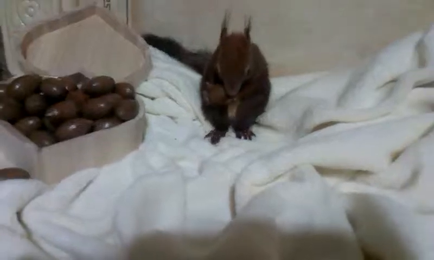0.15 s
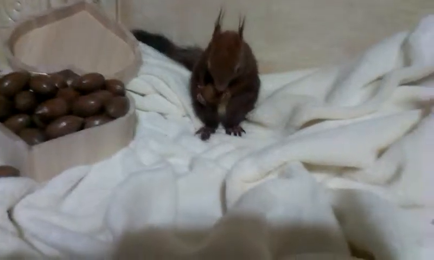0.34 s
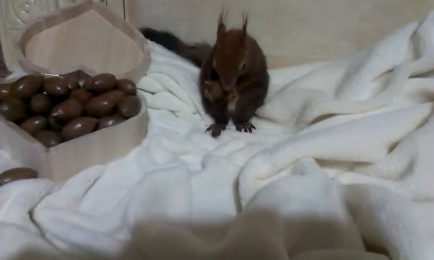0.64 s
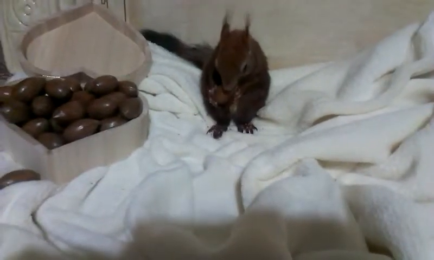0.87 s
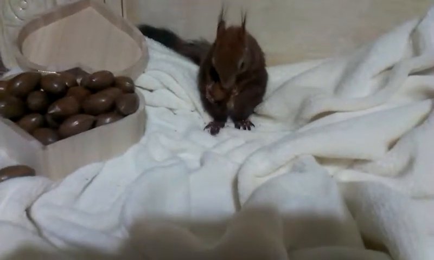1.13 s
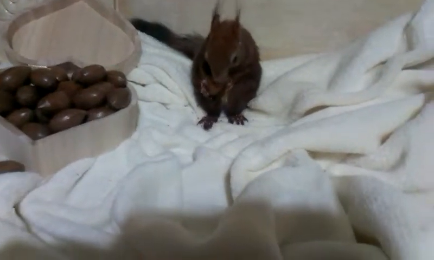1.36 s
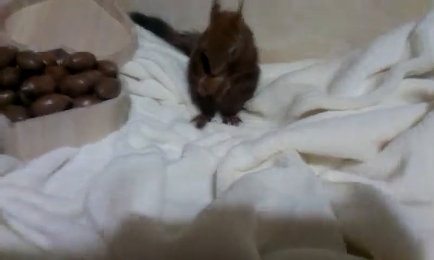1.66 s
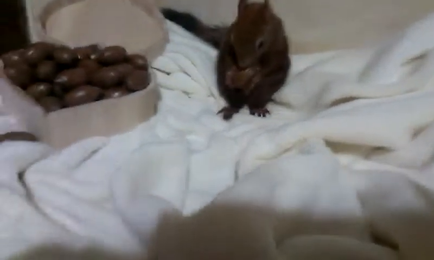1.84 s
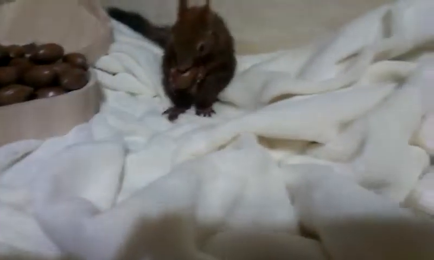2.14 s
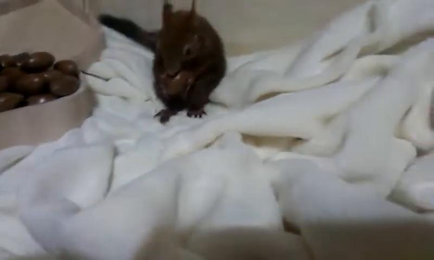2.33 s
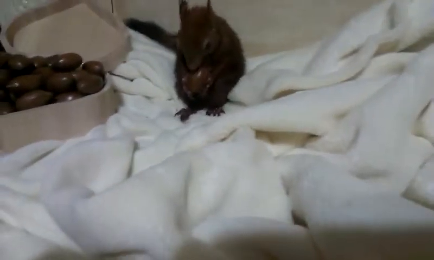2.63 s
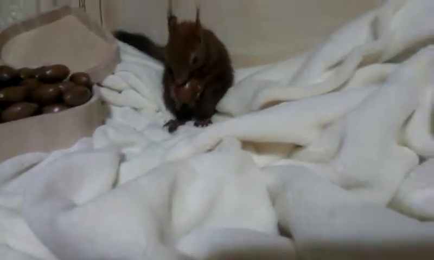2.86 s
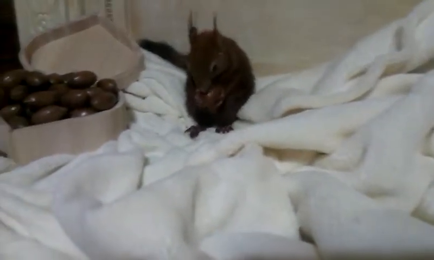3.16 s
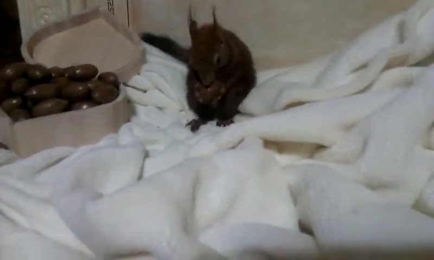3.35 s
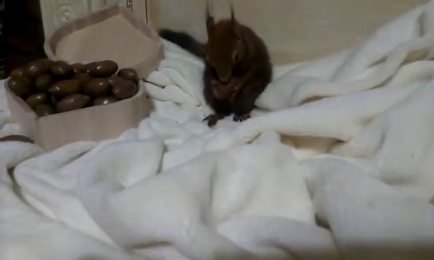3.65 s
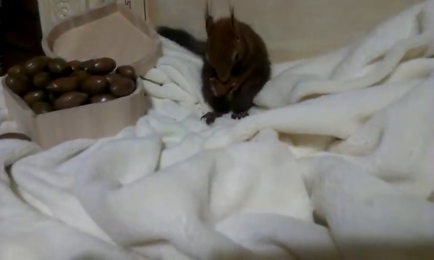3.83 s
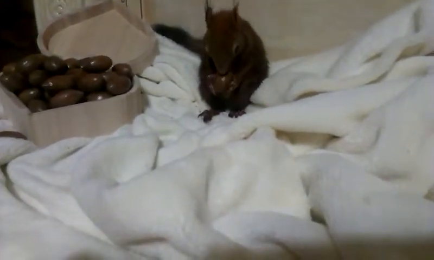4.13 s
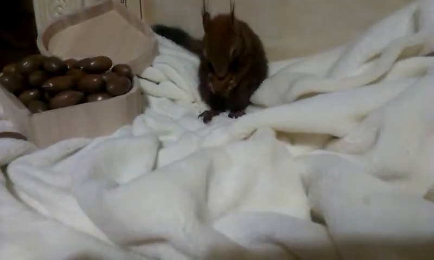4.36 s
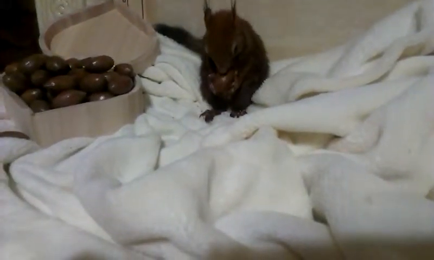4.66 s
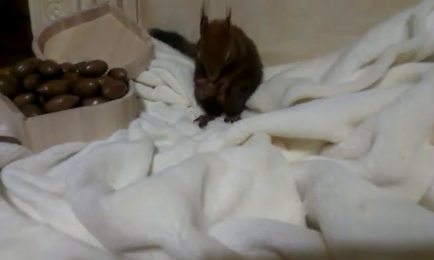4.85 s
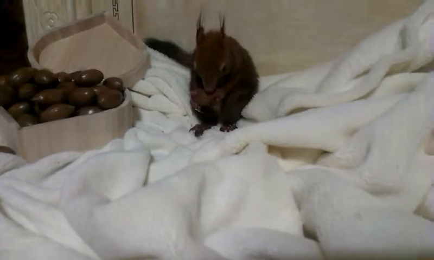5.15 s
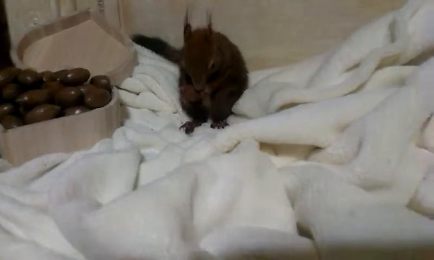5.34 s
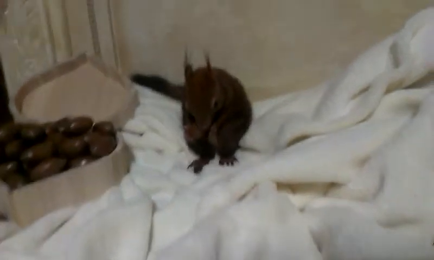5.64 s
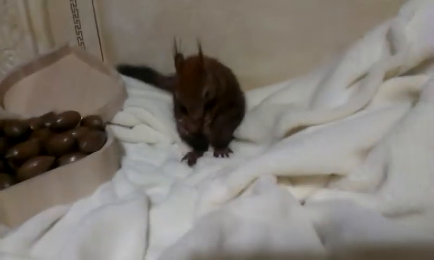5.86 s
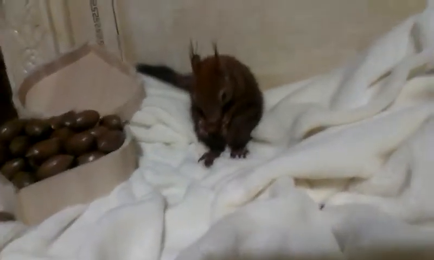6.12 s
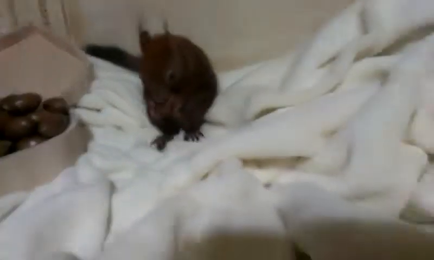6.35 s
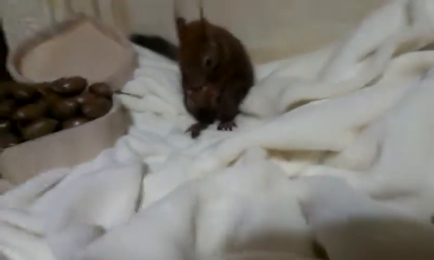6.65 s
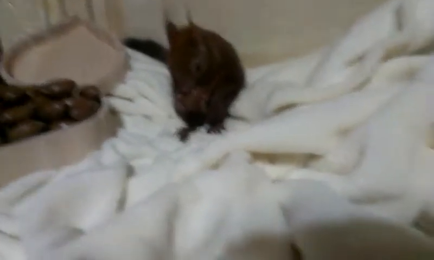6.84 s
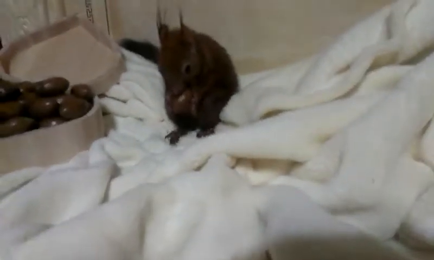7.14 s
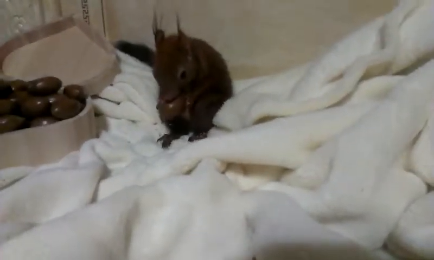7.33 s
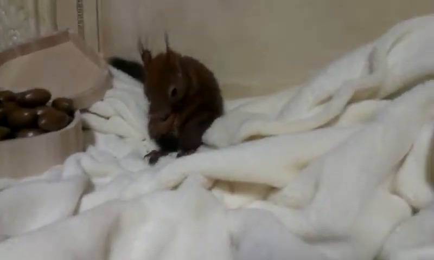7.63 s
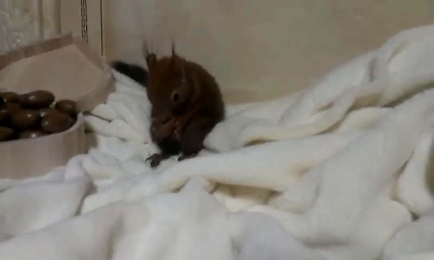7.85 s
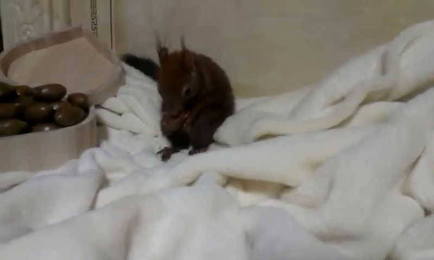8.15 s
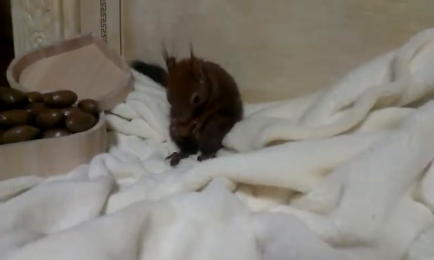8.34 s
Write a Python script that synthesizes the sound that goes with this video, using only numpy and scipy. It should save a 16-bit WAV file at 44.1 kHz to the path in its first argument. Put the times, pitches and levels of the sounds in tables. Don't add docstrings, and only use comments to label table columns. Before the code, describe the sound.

Scattered brittle shell crackles and tiny raspy gnawing strokes, dry and close, softened by blankets with barely any room echo. Bursts are busiest in the first four seconds, then fade to sparse faint nibbles. Sudden handling noise follows: dull knocks, a hard overloaded thump and skin rubbing across the microphone around six seconds. Small cracks and light scraping return near the end. Faint steady hiss lies underneath.

```python
import sys
import numpy as np
from scipy import signal
from scipy.fft import rfft, irfft, next_fast_len
from scipy.io import wavfile
from scipy.ndimage import uniform_filter1d

SR = 44100
rng = np.random.default_rng(int(sys.argv[2]) if len(sys.argv) > 2 else 0)


def int16_out(signal):
    q = np.round(np.clip(np.atleast_2d(signal).T, -1, 1) * 32767)
    wavfile.write(sys.argv[1], SR, q.astype(np.int16))


def makeup_ratio(level_db):
    decades = np.asarray(level_db, float) / 20
    return 10 ** decades


N = 374409


def colour(x, points):
    hz, db = np.transpose(points)
    size = next_fast_len(len(x))
    f_hz = np.maximum(np.arange(size // 2 + 1) * SR / size, 1)
    gain = makeup_ratio(np.interp(np.log(f_hz), np.log(hz), db))
    return irfft(rfft(x, size) * gain, size)[:len(x)]


def unit(x):
    return x / np.sqrt(np.mean(x ** 2))


def band(x, lo_hz, hi_hz):
    return signal.sosfilt(signal.butter(2, [lo_hz, hi_hz], "band", fs=SR, output="sos"), x)


def walk(rate_hz):
    hold = int(SR / rate_hz)
    steps = np.repeat(rng.standard_normal(N // hold + 1), hold)
    return unit(uniform_filter1d(uniform_filter1d(steps, hold), hold)[:N])


def add(out, start_s, x):
    i = max(int(round(start_s * SR)), 0)
    out[i:i + len(x)] += x[:N - i]


def friction(rows, spectrum, split_hz, slips_per_s, scatter_db):
    grains = (rng.random(N) < slips_per_s / SR) * rng.standard_normal(N)
    grains = grains * makeup_ratio(scatter_db * rng.exponential(size=N))
    sound = colour(grains, spectrum)
    low = signal.sosfiltfilt(signal.butter(2, split_hz, fs=SR, output="sos"), sound)
    t = np.arange(N) / SR
    low_gain, high_gain = np.zeros(N), np.zeros(N)
    for s, rise_ms, fall_ms, db, low_db in rows:
        near = slice(int(s * SR), int((s + (rise_ms + 4 * fall_ms) / 1000) * SR))
        ms = (t[near] - s) * 1000
        rise = np.minimum(ms / (.5 * rise_ms), 1)
        fall = np.exp(-(np.maximum(ms - rise_ms, 0) / (1.06 * fall_ms)) ** 2)
        high_gain[near] += makeup_ratio(db) * rise * fall
        low_gain[near] += makeup_ratio(db + low_db) * rise * fall
    return unit(low) * low_gain + unit(sound - low) * high_gain


def breaks():
    # (time [s], peak [dB], brightest [Hz], body re main [dB], thin edge re main [dB])
    snap_rows = [(0.0504, -32.5, 6560, -8.5, -8), (0.0595, -42, 6710, -19, -6),
                 (0.2089, -43, 7140, -21, -12), (0.2634, -38, 6950, -12.5, -20),
                 (0.4488, -47, 5530, -18, -11), (0.4616, -40, 6560, -25, -21),
                 (0.6353, -8, 5400, -19.5, -17.5), (0.6377, -34, 6300, -8, -8),
                 (0.6449, -37, 6150, -19, -16), (0.6501, -39, 5720, -20, -8.5),
                 (0.9425, -40, 5180, -13, -11), (1.1024, -39, 6930, 1.5, -15),
                 (1.1161, -27, 7120, -21, -5.5), (1.2652, -43, 5310, -8, -15),
                 (1.2737, -26.5, 6560, -16, -5), (1.2926, -36, 5940, -3.5, -14),
                 (1.2973, -40, 4240, -3, -15), (1.4533, -42.5, 5120, -13, -17),
                 (1.4622, -27, 5490, -17, -8), (1.4881, -39, 6150, -5, -20),
                 (1.5069, -19, 6300, -17.5, -18), (1.5699, -42.5, 6350, -17, -19),
                 (2.556, -32, 6330, -23, -19), (2.568, -32.5, 7080, -13.5, -17),
                 (3.0783, -29, 5770, -11, -15), (3.2668, -46, 6630, -8, -16.5),
                 (3.5435, -36.5, 5870, -9.5, -24), (3.6344, -40, 5720, -18.5, -19),
                 (3.7938, -30, 6480, -6.5, -21), (3.7967, -37, 6410, -8, -12),
                 (3.8217, -31, 6220, -10.5, -16), (3.8239, -26, 5870, -14, -23),
                 (5.6199, -49.5, 4300, -2.5, -28), (5.7461, -39, 4280, -5.5, -13),
                 (6.3361, -45, 7010, -7, -15), (6.5218, -33, 6180, -10.5, -14),
                 (6.5328, -28, 6150, -10, -15), (6.5389, -35, 6220, -9, -5),
                 (7.8207, -37.5, 6450, -17, -22), (7.8419, -42, 5030, -11, -12)]
    # (time [s], peak [dB], brightest [Hz])
    chip_rows = [(0.2256, -41, 7100), (0.231, -43, 6930), (0.2612, -42, 7080), (0.4356, -52, 6350),
                 (0.6155, -51, 6130), (0.7139, -46, 7270), (1.0754, -54, 5420), (1.0772, -49, 4220),
                 (1.089, -53, 4220), (1.2537, -47, 5140), (1.2578, -44, 5140), (1.3065, -46, 4320),
                 (1.3472, -48, 6350), (1.3585, -50, 6930), (1.4181, -52, 6710), (1.4683, -41.5, 5980),
                 (1.4781, -40, 5980), (1.4899, -54, 5980), (1.5168, -46, 6350), (1.5201, -49, 6390),
                 (1.594, -53, 6240), (1.5955, -46.5, 6820), (1.5973, -49, 6200), (1.6062, -50, 6000),
                 (1.7385, -47.5, 5230), (2.5212, -48, 6540), (2.5453, -49.5, 5530), (2.5505, -44, 6350),
                 (2.9643, -49.5, 6580), (3.4018, -46, 7060), (3.4044, -51.5, 5790), (3.406, -45, 6610),
                 (3.4179, -49, 6990), (3.5353, -43.5, 7100), (3.5458, -39, 6050), (3.5498, -44, 6480),
                 (3.557, -47, 6430), (3.5641, -46, 5850), (3.5712, -50, 5920), (3.5819, -43, 5850),
                 (3.5948, -43, 5570), (3.5986, -46, 5740), (3.7804, -43, 5660), (3.8085, -46.5, 6580),
                 (3.9692, -53, 6730), (3.9715, -45, 6520), (3.9782, -45, 6430), (4.1148, -56, 6240),
                 (4.4772, -48.5, 5870), (4.8073, -49.5, 6840), (5.7382, -51.5, 4240), (5.7487, -49.5, 4320),
                 (5.8274, -49.5, 5770), (6.4982, -51, 6610), (6.5403, -37, 6240), (6.5473, -44, 6430),
                 (6.5566, -50, 5850), (7.608, -47, 6330), (7.7758, -50, 6710), (7.8221, -48, 6820)]
    # (time [s], peak [dB])
    crumb_rows = [(0.046, -53), (0.1173, -50), (0.2373, -58), (0.2462, -51), (0.2666, -55), (0.6212, -49),
                  (0.7173, -54), (0.7504, -55), (1.0729, -53), (1.128, -52), (1.186, -56), (1.187, -55),
                  (1.2466, -48), (1.5311, -43), (1.7899, -54), (1.922, -53), (1.9986, -55.5), (2.182, -52),
                  (2.1897, -51), (2.3155, -56.5), (2.3496, -52), (2.5232, -49), (2.538, -55.5),
                  (2.5773, -52.5), (3.0664, -63), (3.0929, -52), (3.1022, -53), (3.2347, -51),
                  (3.4485, -50), (3.6378, -51), (3.643, -50), (3.7752, -53), (3.7782, -50), (3.96, -53),
                  (4.0439, -52.5), (4.9323, -53), (4.9347, -61), (5.417, -53.5), (5.593, -54),
                  (6.3238, -54.5), (6.351, -58), (6.4444, -58), (6.5534, -52), (7.5723, -54),
                  (7.6184, -53.5), (7.761, -54.5), (7.808, -53), (7.8126, -55), (7.8435, -49),
                  (7.8451, -51)]
    chip_hz, chip_spread_hz = 6100, 300
    body_mean_db, body_spread_db = -10, 2
    edge_mean_db, edge_spread_db = -16, 3
    chance = rng.standard_normal((200, 3))
    small = list(chip_rows)
    for (s, db), c in zip(crumb_rows, chance[:, 2]):
        small.append((s, db, chip_hz + chip_spread_hz * c))
    rows = list(snap_rows)
    for (s, db, hz), (a, b, _) in zip(small, chance):
        rows.append((s, db, hz, body_mean_db + body_spread_db * a, edge_mean_db + edge_spread_db * b))
    return rows


def cracks():
    # (frequency [Hz], width [Hz], level [dB])
    shell_modes = [(1430, 300, -18), (2440, 330, -14), (3450, 330, -18), (4350, 700, -10), (5400, 650, 0),
                   (6300, 600, -2), (7000, 500, -5), (8300, 500, -14), (9300, 900, -13), (10100, 700, -15)]
    ring_damping, ring_attack_s = 1.35, .0002
    crumble_db, crumble_s = -26, .0015
    echo_s, echo_db = .00103, -8
    out, t = np.zeros(N), np.arange(300) / SR
    hz, width_hz, mode_db = np.transpose(shell_modes)[:, :, None]
    modes = len(hz)
    body, edge = hz[:, 0] < 3800, hz[:, 0] > 7600
    since = t[:130]
    crumble = makeup_ratio(crumble_db) * np.exp(-since / crumble_s)
    decay = np.exp(-np.pi * ring_damping * width_hz * t)
    attack = 1 - np.exp(-t / ring_attack_s)
    alternate = (-1) ** np.arange(modes)[:, None]
    chance = rng.standard_normal((200, 2 * modes + 131))
    for (s, peak_db, bright_hz, body_db, edge_db), row in zip(breaks(), chance):
        detune, scatter = row[:2 * modes].reshape(2, -1, 1)
        off_hz = hz - bright_hz
        favour_db = -6 * (off_hz / 900) ** 2 / (1 + (off_hz / 1200) ** 2) * ~body[:, None]
        level = alternate * makeup_ratio(mode_db + favour_db + 1.4 * scatter)
        rings = level * np.sin(2 * np.pi * hz * (1 + 0.01505 * detune) * t) * decay * attack
        force = row[-len(since):] * crumble + (since == 0)
        echo_at = echo_s * (1 + .02 * row[-len(since) - 1]) * SR
        force[int(np.clip(echo_at, 20, 100))] -= makeup_ratio(echo_db)
        parts = (~body & ~edge, body, edge)
        main, low, top = (unit(np.convolve(rings[part].sum(axis=0), force)) for part in parts)
        piece = main + makeup_ratio(body_db) * low + makeup_ratio(edge_db) * top
        add(out, s - .0001, makeup_ratio(peak_db) * piece / np.abs(main).max())
    return out


def scraping():
    # (start [s], length [ms], level [dB], hollow body re level [dB])
    stroke_rows = [(.044, 27, -56.5, -12), (.207, 32, -59, -8), (0.257, 28, -64.5, -9),
                   (0.633, 39, -55.5, -4), (.705, 56, -68, -23), (.918, 39, -63.5, -6),
                   (1.068, 33, -62, -1), (1.11, 29, -56, -5.5), (1.243, 70, -58.5, -3),
                   (1.455, 28, -55, -2.5), (1.48, 59, -73, 9), (2.171, 41, -63, -7), (2.32, 52, -63, -6.5),
                   (2.513, 20, -61, -14), (2.541, 46, -58, -10), (2.865, 50, -68.5, -5),
                   (3.037, 57, -63.5, -5.5), (3.233, 42, -60, -6.5), (3.398, 32, -56, -6.5),
                   (3.529, 46, -53.5, -7.5), (3.77, 48, -57, -9), (3.815, 25, -49.5, -7),
                   (3.958, 39, -58.5, -6), (5.559, 70, -77, 4), (5.731, 41, -68.5, 4), (6.319, 51, -68, -1),
                   (6.524, 40, -61, 0), (6.573, 150, -74.5, 7), (7.535, 115, -69.5, -6),
                   (7.804, 63, -65, -12)]
    # (start [s], length [ms], level [dB])
    nibble_rows = [(0.311, 6.3, -66), (.741, 12, -67), (1.085, 10, -65), (5.445, 12, -68), (5.587, 16, -73),
                   (5.67, 15, -72), (1.343, 42, -69), (1.588, 18, -61.5), (3.59, 18, -67.5),
                   (3.631, 20, -65), (4.04, 9.3, -61), (4.448, 40, -67.5), (4.538, 12, -70),
                   (4.927, 39, -65.5), (5.267, 39, -69), (5.415, 23, -68.5), (5.499, 20, -69),
                   (5.821, 17, -65.5), (7.744, 44, -68.5), (8.1, 26, -71), (8.26, 30, -73)]
    # (frequency [Hz], density [dB per Hz])
    scrape_spectrum = [(500, -35), (900, -17), (1900, -13), (2350, -3), (3000, -11), (4900, -13), (5600, 0),
                       (6600, -1), (7300, -5), (8000, -17), (10300, -18)]
    nibble_body_db, bite_in_share = -6.5, .33
    strokes = list(stroke_rows) + [(s, ms, db, nibble_body_db) for s, ms, db in nibble_rows]
    rows = [(s, bite_in_share * ms, (1 - bite_in_share) * ms, db, body_db)
            for s, ms, db, body_db in strokes]
    return friction(rows, scrape_spectrum, split_hz=4200, slips_per_s=6000, scatter_db=1.6)


def turned(nut):
    # (time [s], opening gain [dB], rim gain [dB])
    facing_rows = [(0, -1, -2), (.5, -1, 3), (1.1, 8, 0), (1.35, 2, 0), (1.6, 2, -2), (2.1, -2, -0.5),
                   (2.6, -4, -2), (3.1, -5, -5), (3.5, -1, -3), (3.85, 1, -2), (5.2, 0, 0), (5.55, 11, -3),
                   (5.79, 7, -3), (5.82, 5, 0), (6.45, 3, -8), (6.56, 7, -12), (7.7, -2, -3), (7.84, 5, 2)]
    opening_hz, rim_hz = (3300, 4700), (4700, 5600)
    s, *gains_db = np.transpose(facing_rows)
    t = np.arange(N) / SR
    out = nut
    for db, hz in zip(gains_db, (opening_hz, rim_hz)):
        part = signal.sosfiltfilt(signal.butter(2, hz, "band", fs=SR, output="sos"), nut)
        out = out + (makeup_ratio(np.interp(t, s, db)) - 1) * part
    return out


def thuds(rows, ring_cycles):
    out = np.zeros(N)
    for s, db, hz, direction, load_cycles in rows:
        cycles = np.arange(-int(3 * SR / hz), int(4 * SR / hz)) * hz / SR
        envelope = np.exp(np.where(cycles < 0, cycles / max(load_cycles, .02), -cycles / ring_cycles))
        swing = envelope * np.cos(2 * np.pi * cycles)
        leak = np.exp(-((cycles - .3) / 0.66) ** 2)
        balanced = swing - leak * swing.sum() / leak.sum()
        add(out, s + cycles[0] / hz, direction * makeup_ratio(db) * balanced)
    return out


def knocks():
    # (peak time [s], peak [dB], frequency [Hz], direction [signed gain], load-up [cycles])
    knock_rows = [(0.2198, -25.5, 197, 0.51, 0.23), (1.0296, -59, 200, -0.91, 0.49),
                  (1.5702, -46.5, 750, -0.82, 0.2), (1.5959, -48.5, 279, 0.57, 0.24),
                  (1.8234, -53.5, 267, 0.94, 0.53), (2.0885, -19, 342, 0.83, 0.1),
                  (2.628, -55.5, 352.6, 1, 0.3), (3.9225, -44, 742, -0.61, 0.28),
                  (5.5036, -38.5, 249.1, 0.84, 0.086), (5.7119, -48, 423, 0.92, 0.15),
                  (5.7637, -36, 184.4, 0.21, 0.12), (5.8544, -48, 818, 0.64, 0.24),
                  (5.929, -33.5, 227, -0.62, 0.096), (5.9414, -38.5, 343, -0.99, 0.11),
                  (5.9529, -41, 397, -0.84, .15), (5.9806, -45, 300, -1, .2), (5.9952, -48, 353, -1, .15),
                  (6.0031, -47, 300, -0.69, .15), (6.0234, -48, 495, 0.58, .15),
                  (6.052, -48.5, 400, 1, .15), (5.417, -54, 700, 1, .2), (5.6028, -56, 796, 0.88, .2),
                  (5.8778, -52, 800, 1, .1), (5.8881, -52, 800, 0.9, .15), (6.1851, -37, 690, 0.83, .15),
                  (6.2228, -49, 600, 1, .15), (6.4458, -55, 596, 0.85, .2), (7.0331, -54, 332, 1, .25),
                  (5.9495, -22, 247, 0.14, 0.055), (6.1607, -25.5, 650, -0.86, 0.22),
                  (6.2305, -31.5, 376, -0.61, 0.063), (6.268, -38, 228, 0.86, 0.04),
                  (6.4944, -43, 620, 1, 0.33), (6.5686, -23, 620, 0.82, 0.094),
                  (6.6189, -29.5, 326, -1.2, 0.2), (6.7671, -40.5, 277, -1.3, 0.27),
                  (6.8755, -47.5, 367, 0.8, 0.3), (8.1156, -52.5, 376, -0.96, 0.27)]
    return band(thuds(knock_rows, ring_cycles=0.28), 66, 5300)


def pushes():
    # (peak time [s], peak [dB], frequency [Hz], direction [signed gain], load-up [cycles])
    push_rows = [(.65, -55, 91, 0.83, 0.37), (1.04, -46.5, 130, 0.73, 0.38), (1.5, -43.5, 180, 0.67, 0.14),
                 (1.97074, -14, 680, 1, .12), (6.1045, -21, 32, 1, .12), (6.116, -29, 22, -1, .2),
                 (2.22, -58, 74, 1, 0.62), (3.93, -65, 120, 1, 0.89), (4.4, -59, 100, 1, 0.66),
                 (5.972, -35.5, 16.3, 0.84, 0.53), (6.0655, -43, 5, 1, 0.33), (6.0886, -24, 380, 1, 0.23),
                 (6.0897, -15.5, 440, 0.44, 0.055), (6.0938, -15, 120, 0.85, 0.25),
                 (6.098, 1.5, 410, 0.66, .15), (6.0995, -17.5, 340, -1.8, 0.099),
                 (6.1006, -12, 340, -0.94, 0.13), (6.1035, -15, 120, 0.85, .4)]
    return thuds(push_rows, ring_cycles=0.14)


def skid(curve, gap_ms, direction):
    spread_db = 2
    s, db, hz = np.transpose(curve)
    chance = rng.random((30, 2))
    at_s = s[0] + np.cumsum(gap_ms / 1000 * (.3 + 1.4 * chance[:, 0]))
    size_db = np.interp(at_s, s, db) + spread_db * (2 * chance[:, 1] - 1)
    return [(a, d, direction, np.interp(a, s, hz)) for a, d in zip(at_s, size_db) if a < s[-1]]


def slips():
    # (time [s], peak [dB], direction [sign], port ring [Hz])
    slip_rows = [(.219, -45, 1, 1300), (.3155, -49, 1, 1300), (1.97063, -2, 1, 6800),
                 (1.97096, -11, 1, 6400), (2.0877, -38, 1, 4800), (5.5031, -41, -1, 2500),
                 (5.7637, -46, 1, 4000), (5.929, -32, -1, 2200), (5.9405, -48, 1, 1500),
                 (5.955, -52, 1, 3000), (5.998, -49, -1, 1200), (6.058, -38, -1, 3500),
                 (6.0625, -42, -1, 3500), (6.0706, -46, 1, 3500), (6.0761, -37, -1, 3500),
                 (6.099, -17, 1, 2000), (6.1002, -10.5, 1, 3000), (6.105, -19, 1, 4000),
                 (6.1073, -16, 1, 4400), (6.1094, -18, 1, 4400), (6.1604, -33, 1, 2000),
                 (6.268, -37, 1, 6300), (6.4982, -48, 1, 2500), (6.5686, -31, 1, 3500),
                 (6.7449, -30, 1, 5500), (7.912, -50, 1, 2700), (8.183, -50, 1, 2700)]
    # (time [s], slip peak [dB], port ring [Hz])
    skid_on = [
        (6.081, -42.5, 3000),
        (6.088, -35, 3000),
        (6.096, -38.5, 2500),
    ]
    # (time [s], slip peak [dB], port ring [Hz])
    skid_off = [
        (6.11, -25, 4600),
        (6.114, -20.5, 4790),
        (6.12, -26, 5400),
        (6.132, -37.5, 5600),
    ]
    rows = list(slip_rows) + skid(skid_on, gap_ms=2.2, direction=-1)
    rows = rows + skid(skid_off, gap_ms=1.7, direction=1)
    out, t = np.zeros(N), np.arange(-20, 200) / SR
    for s, db, direction, ring_hz in rows:
        spike = np.exp(-(t * ring_hz / .28) ** 2)
        ring_envelope = np.where(t > 0, np.exp(-t * ring_hz / 1.6), spike)
        ring = .4 * np.cos(2 * np.pi * ring_hz * t) * ring_envelope
        recoil = -.25 * np.exp(-t / .0005) * (1 - spike) * (t > 0)
        add(out, s + t[0], direction * makeup_ratio(db) * (spike + ring + recoil) / 1.4)
    return out


def rubbing():
    # (start [s], rise [ms], fall [ms], level [dB], low band re level [dB])
    rub_rows = [(6.111, 5.4, 11, -43.5, 4), (6.132, 50, 63, -58.5, -0.5), (6.465, 40, 20, -62.5, 0.5),
                (6.612, 37, 36, -56.5, -0.5), (6.645, 39.5, 21, -53.5, -7), (6.08, 8, 8, -53.5, 5),
                (5.99, 15, 15, -80, 14), (6.02, 30, 20, -82, 15), (6.76, 18, 61, -64, 1),
                (6.855, 14, 60, -62, 1), (5.93, 8.7, 117, -84, 16.5), (6.97, 26, 78, -71.5, 1),
                (7.1, 26, 48, -69.5, -3)]
    # (frequency [Hz], density [dB per Hz])
    rub_spectrum = [(90, -20), (150, 0), (724, -4), (1400, -4), (3200, -8), (5200, -5), (7000, -10),
                    (7830, -21), (9500, -15), (10500, -22)]
    return friction(rub_rows, rub_spectrum, split_hz=2000, slips_per_s=16000, scatter_db=1.0)


def room(x):
    level_db, t60_s, gap_s = -20.5, .16, .003
    t = np.arange(int(.3 * SR)) / SR
    grains = rng.standard_normal(len(t)) * makeup_ratio(3.6 * rng.standard_normal(len(t)))
    tail = grains * makeup_ratio(-60 * t / t60_s) * (t > gap_s)
    return makeup_ratio(level_db) * signal.fftconvolve(x, tail / np.sqrt(np.sum(tail ** 2)))[:N]


def quiet():
    # (frequency [Hz], density [dB per Hz])
    hiss_spectrum = [(25, -2.5), (60, -4), (100, -6), (160, -25.5), (210, -8.5), (700, -11.5),
                     (2500, -15.5), (6500, -18.5), (8000, -27.5), (10200, -21.5), (10900, -30.5)]
    # (time [s], port air level [dB], grip rumble level [dB])
    air_rows = [(0, -78, -90), (.8, -75, -88), (2, -77, -88), (2.6, -82, -94), (4.9, -92, -94),
                (5.1, -92, -78), (5.4, -92, -81), (5.9, -88, -74), (5.95, -86, -63), (6.08, -84, -59),
                (6.14, -68, -62), (6.24, -68, -70), (6.29, -82, -74), (6.45, -82, -90), (6.8, -82, -70),
                (7, -84, -76), (7.3, -86, -92), (8.49, -88, -92)]
    hiss_db, sway_db = -69.5, -72.5
    s, air_db, grip_db = np.transpose(air_rows)
    t = np.arange(N) / SR
    hiss = makeup_ratio(hiss_db) * unit(colour(rng.standard_normal(N), hiss_spectrum))
    air_gain = makeup_ratio(np.interp(t, s, air_db) + 2.5 * walk(12))
    air = unit(band(rng.standard_normal(N), 5900, 7200)) * air_gain
    grip_gain = makeup_ratio(np.interp(t, s, grip_db) + 5.0 * walk(25))
    grip = unit(band(rng.standard_normal(N), 65, 180)) * grip_gain
    sway = makeup_ratio(sway_db) * unit(band(rng.standard_normal(N), 6.7, 29))
    return hiss + air + grip + sway


def scene():
    nut = turned(band(makeup_ratio(1.5) * cracks(), 1000, 15000) + scraping())
    hand = knocks() + pushes() + slips() + rubbing()
    return (nut + room(nut) + hand + quiet())[None]


def low_pass(x):
    return signal.sosfilt(signal.butter(12, 11470, fs=SR, output="sos"), x)


def record(dry):
    top_hz, offset = 10450, .0166
    cut = signal.sosfiltfilt(signal.ellip(8, .1, 24, top_hz, fs=SR, output="sos"), dry)
    return low_pass(cut + offset)


dry = scene()
out = record(dry)
int16_out(out)
```